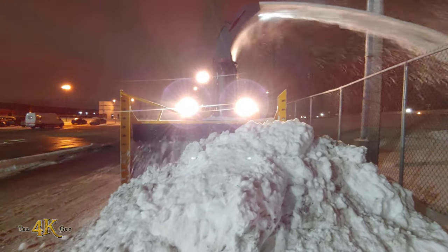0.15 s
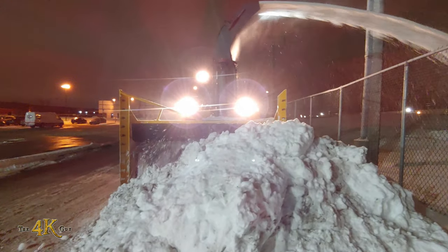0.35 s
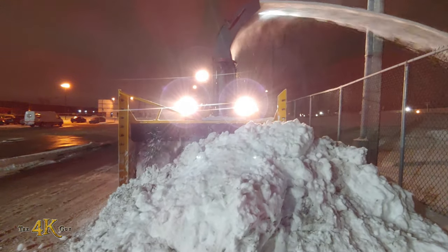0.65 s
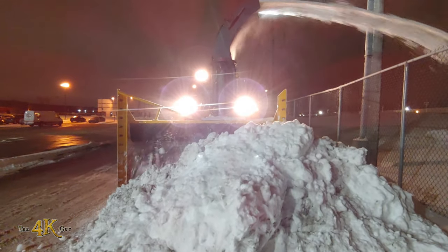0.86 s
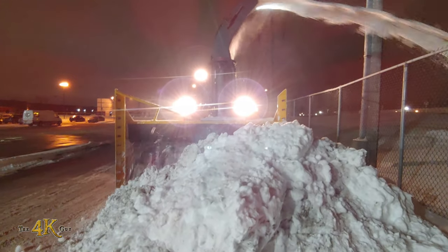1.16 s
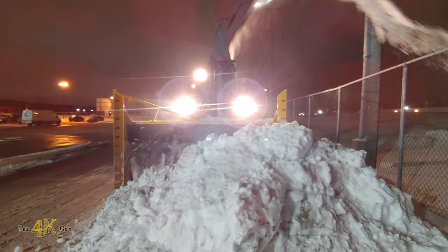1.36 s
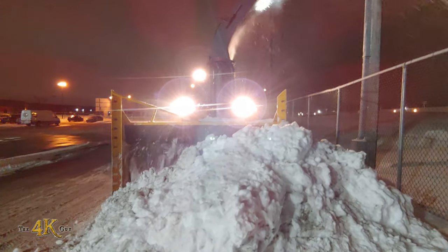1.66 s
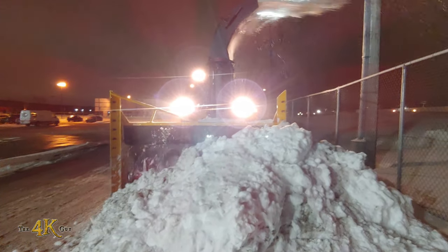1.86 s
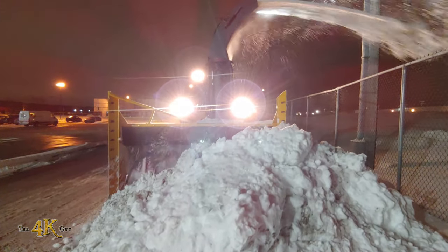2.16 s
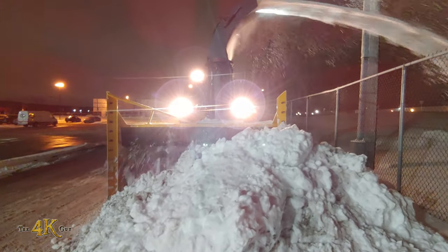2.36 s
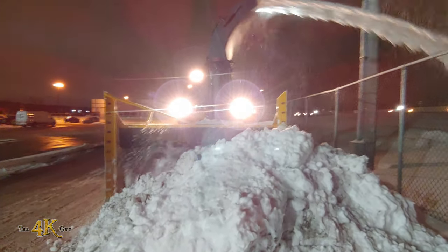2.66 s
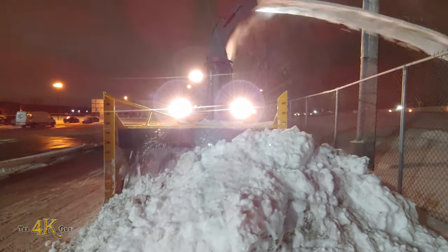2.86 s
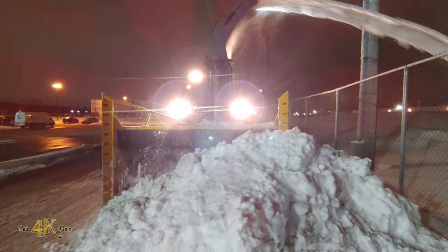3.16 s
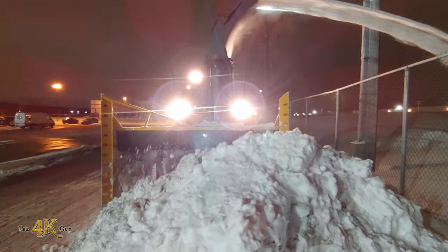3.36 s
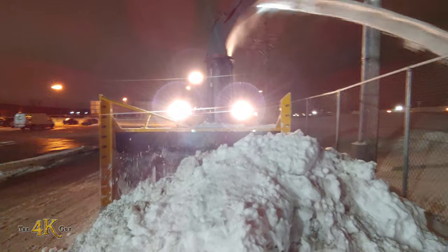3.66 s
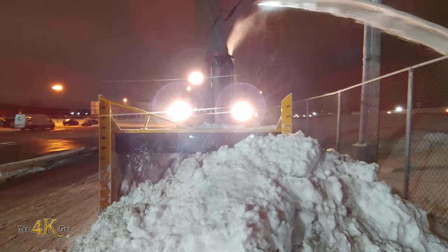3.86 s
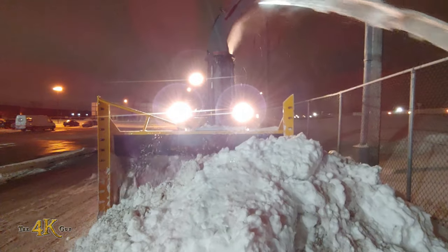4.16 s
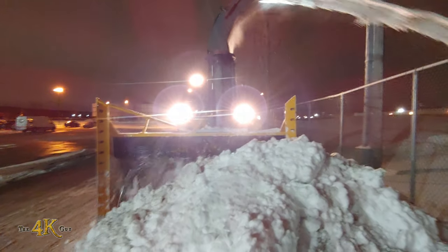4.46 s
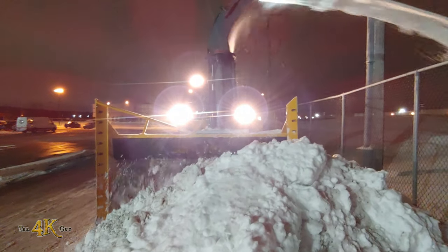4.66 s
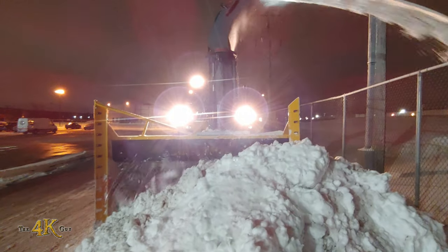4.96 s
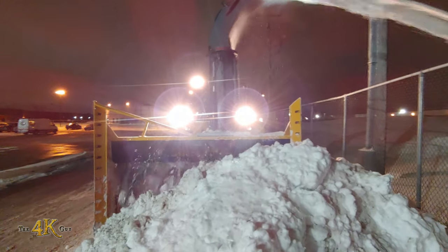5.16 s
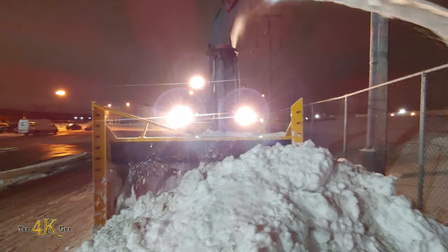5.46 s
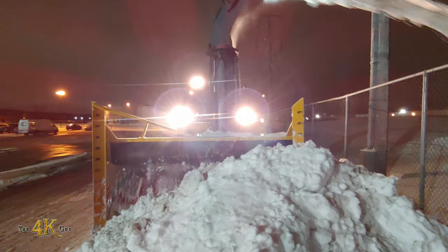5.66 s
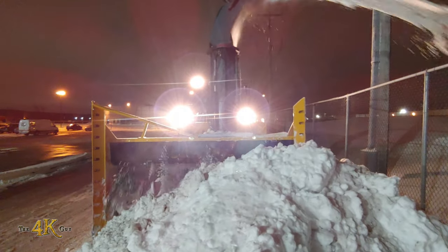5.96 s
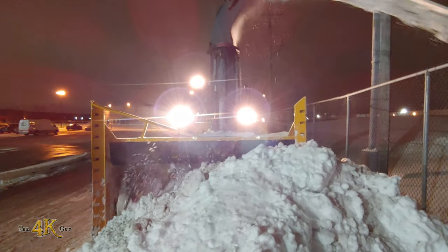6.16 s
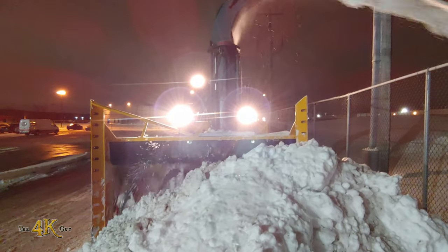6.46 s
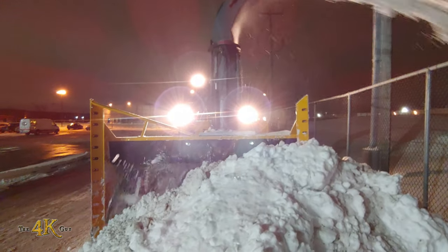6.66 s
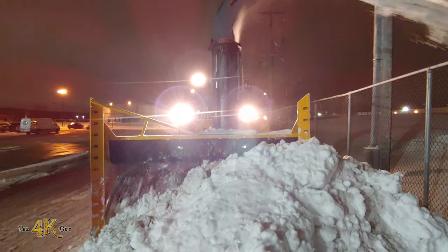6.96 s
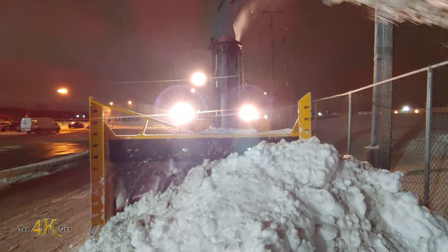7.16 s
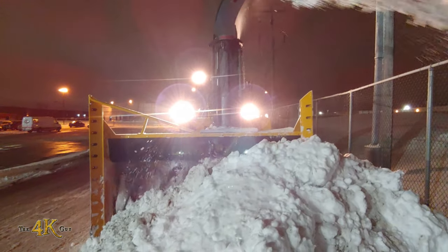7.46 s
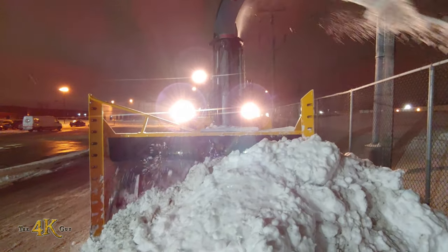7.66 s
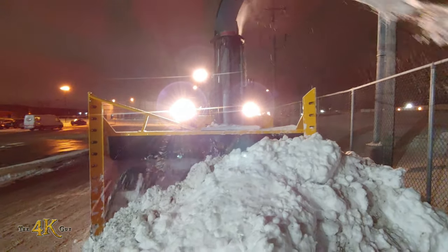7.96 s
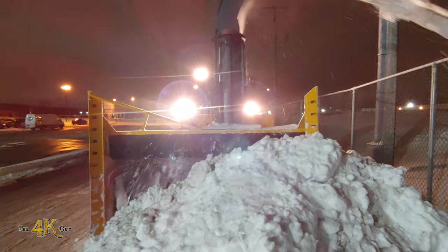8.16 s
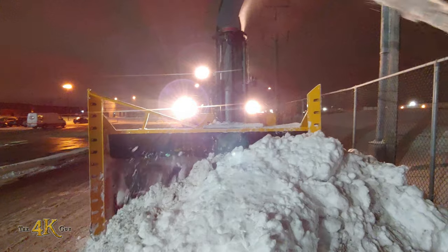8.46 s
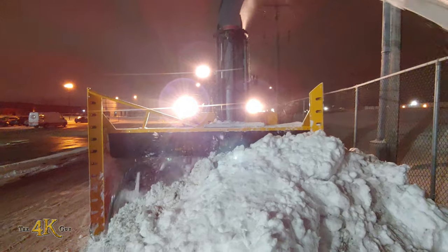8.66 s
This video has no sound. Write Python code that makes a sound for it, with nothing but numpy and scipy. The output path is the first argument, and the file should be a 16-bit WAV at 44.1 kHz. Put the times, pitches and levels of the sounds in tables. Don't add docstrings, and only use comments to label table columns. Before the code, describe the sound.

Heavy engine drone around 100 hertz under a dense bright hiss of thrown snow, with wavering mid-pitched whines and a faint very high whistle, all continuous.

```python
import sys
import numpy as np
from scipy import signal
from scipy.fft import rfft, irfft, next_fast_len
from scipy.io import wavfile
from scipy.ndimage import uniform_filter1d, map_coordinates

SR = 44100
rng = np.random.default_rng(int(sys.argv[2]) if len(sys.argv) > 2 else 0)


def volts_from_db(level):
    exponent = np.asarray(level, float) / 20
    return 10 ** exponent


def unload_wav(signal):
    wavfile.write(
        sys.argv[1],
        SR,
        np.round(np.clip(np.atleast_2d(signal).T, -1, 1) * 32767).astype(np.int16),
    )


N = 388521

# time in seconds, crank speed in Hz, firing tone in dB, left over right in dB.
CRANK_RUN = [(0, 34.4, -12, 2), (.55, 34.57, -10, 2.6), (1.0, 34.28, -8.8, 3.4), (1.5, 33.75, -8, 1.6),
             (2.0, 33.58, -8.5, 1.5), (2.45, 33.45, -8, 1.5), (2.55, 33.37, -12.5, 2.8),
             (2.9, 33.27, -11.5, 2.5), (3.36, 32.73, -14, 0), (3.5, 33.28, -13, 1.5), (3.9, 33.5, -10, 3.3),
             (4.4, 33.9, -10.5, 3.4), (5.1, 33.14, -10.5, 4), (6.2, 33.39, -9.5, 3.5),
             (6.75, 33.86, -9.5, 3), (7.4, 33.78, -9.5, 3), (8.2, 32.96, -9, 4.5), (8.81, 33.1, -9.5, 3.5)]
# time in seconds, flow in dB over an even feed.
SNOW_FLOW = [(0, 2.5), (.35, 1.5), (.85, 0), (2.35, -.5), (2.65, 2.5), (3.5, 3.5), (4.0, 1.5), (5.1, 0.5),
             (7.0, 0.5), (7.5, .5), (8.22, -2.5), (8.81, 0.5)]


def along(points, hz):
    f, v = np.transpose(points)
    return np.interp(np.log(hz + 1), np.log(f + 1), v)


def unit(x):
    return x / np.sqrt(np.mean(x ** 2) + 1e-20)


def curves(rows):
    s, *columns = np.transpose(rows)
    t = np.arange(N) / SR
    return [np.interp(t, s, column) for column in columns]


def wobble(rate):
    knots = rng.standard_normal(int(N * rate / SR) + 4)
    return map_coordinates(knots, [np.arange(N) * rate / SR], order=1)


def angle(hz):
    return 2 * np.pi * np.cumsum(hz) / SR


def tone(phase, db, blur, flutter_db):
    level = volts_from_db(db + flutter_db * wobble(18))
    return np.sqrt(2) * level * np.sin(phase + blur * wobble(25))


def swells(rest_db, rows):
    t = np.arange(N) / SR
    bells = sum(volts_from_db(db) * np.exp(-.5 * ((t - s) / width) ** 2) for s, width, db in rows)
    return 20 * np.log10(volts_from_db(rest_db) + bells)


def filtered(x, response):
    m = next_fast_len(N + 8192)
    return irfft(rfft(x, m) * response(np.fft.rfftfreq(m, 1 / SR)), m)[..., :N]


def rush(spectrum, patchy_db):
    # frequency in Hz, coherence of the two ports from 0 to 1.
    coherence = [(60, 0.77), (500, 0.99), (1000, 0.3), (2000, 0), (2800, 0.12), (3800, 0.2), (4600, 0),
                 (6500, 0.66), (8500, 0.32), (12800, 0), (15000, 0.2)]
    z = signal.stft(rng.standard_normal((2, N)), nperseg=512)[2]
    patches = uniform_filter1d(rng.standard_normal(z.shape[1:]), size=6, axis=0)
    patches = uniform_filter1d(patches, size=12, axis=1)
    pair = signal.istft(z * volts_from_db(patchy_db * unit(patches)), nperseg=512)[1][:, :N]

    def response(hz):
        turn = np.arccos(np.clip(along(coherence, hz), 0, 1)) / 2
        return volts_from_db(along(spectrum, hz)) * [np.cos(turn), np.sin(turn)]

    same, other = filtered(pair, response)
    return unit(np.array([same + other, same - other]))


def diesel(crank):
    # centre in seconds, width in seconds, level in dB.
    stumbles = [
        [(.35, 0.59, -19), (2.1, 0.17, -22), (3.3, 0.58, -27)],
        [(3.1, .05, -26), (3.44, 0.047, -19)],
        [(3.3, 0.44, -33.5)],
    ]
    # multiple of crank speed, rms level in dB.
    weak_orders = [(.5, -32), (1.5, -40), (2.5, -40), (3.5, -51), (4.5, -40.5), (5, -44.5), (7, -45.5),
                   (8, -48), (9, -45.5), (13, -45), (19, -46.5), (30.83, -46.5), (34.5, -49), (39, -42.5),
                   (43.17, -37.5), (96, -67), (120, -46)]
    auger_hz = 2.97
    t = np.arange(N) / SR
    _, firing_db, pan_db = curves(CRANK_RUN)
    once_db = swells(-32.5 + 0.5 * t, stumbles[0])
    twice_db = swells(-33.5, stumbles[1])
    fourth_db = swells(-37, stumbles[2])

    port_gains = volts_from_db(np.array([pan_db - 3.5, 5 - pan_db]) / 2)
    boom = port_gains * tone(3 * crank, firing_db, blur=0.048, flutter_db=0.6)
    boom = boom + tone(6 * crank + 1.95, -25.5 + 1.09 * t, blur=.12, flutter_db=.8)
    boom = boom + tone(crank, once_db, blur=.08, flutter_db=.3)
    boom = boom + tone(crank + 2 * np.pi * auger_hz * t, once_db - 11, blur=.08, flutter_db=2.0)
    boom = boom + tone(2 * crank, twice_db, blur=.3, flutter_db=3.0)
    boom = boom + tone(4 * crank, fourth_db, blur=0.25, flutter_db=6.0)

    growl_db = 0.45 * curves(SNOW_FLOW)[0]
    for multiple, db in weak_orders:
        phase = multiple * crank + 2 * np.pi * rng.random()
        boom = boom + tone(phase, db + growl_db + 2.5 * wobble(2), blur=.45, flutter_db=2.5)
    return boom


def snow(crank):
    # frequency in Hz, density in dB per Hz.
    rumble_spectrum = [(20, -30), (40, -6), (65, -0.5), (120, -3.5), (170, -4.5), (260, -10.5), (400, -9.5),
                       (600, -13.5), (900, -16), (1300, -37.5)]
    roar_spectrum = [(500, -4), (800, 1.5), (1100, -2.5), (1750, -8), (2300, -4), (2800, -5.5),
                     (3500, -1.5), (4300, -10), (6000, -47)]
    hiss_spectrum = [(3000, -17), (4500, -3.5), (5500, -3), (6500, 4), (7500, 3), (8500, -9), (10000, -13),
                     (11500, -18.5), (13000, -47)]
    spray_spectrum = [(9000, -23), (11000, -5), (12500, 2), (14000, -5), (16000, 1)]
    even_db = [-26.5, -27.5, -23, -41]
    growth = [0.66, 0.53, 1.36, 0.63]
    flow_db, = curves(SNOW_FLOW)
    rumble_db, roar_db, hiss_db, spray_db = [db + grows * flow_db for db, grows in zip(even_db, growth)]
    load = wobble(14)
    beat = np.cos(3 * crank + 0.92)
    roar_db = roar_db + .5 * load + 0.47 * beat
    hiss_db = hiss_db + 0.57 * load + 1.1 * beat + 0.78 * np.cos(crank)
    spray_db = spray_db + .7 * load + .8 * wobble(40)
    rumble = volts_from_db(rumble_db) * rush(rumble_spectrum, patchy_db=2.45)
    roar = volts_from_db(roar_db) * rush(roar_spectrum, patchy_db=1.5)
    hiss = volts_from_db(hiss_db) * rush(hiss_spectrum, patchy_db=1.16)
    spray = volts_from_db(spray_db) * rush(spray_spectrum, patchy_db=3.5)
    return rumble + roar + hiss + spray


def shaft_tones(crank, orders, rest_db, loads):
    total = 0
    for k, db, rows in zip(orders, rest_db, loads):
        total = total + tone(k * crank + k, swells(db, rows), blur=.3 + .004 * k, flutter_db=2.1 + .008 * k)
    return total


def pump(crank):
    orders = [12, 24, 36, 48, 60, 108]
    rest_db = [-42, -52, -41.5, -58, -53, -52]
    # centre in seconds, width in seconds, level in dB.
    peaks = [
        [(2.1, .35, -35.5), (3.0, 0.097, -35), (4.55, 0.11, -34)],
        [(.7, 1, -34.5), (1.8, 0.16, -29.5), (2.3, .25, -25), (2.8, .12, -30.5), (3.28, 0.075, -24),
         (3.65, 0.079, -30), (4.3, 0.26, -21.5), (5.15, 0.081, -34.5), (6.85, 0.32, -32.5), (7.5, 0.33, -38),
         (8.6, 0.31, -28)],
        [(1.0, 0.28, -39), (3.25, 0.1, -41), (4.3, .1, -39), (5.3, 0.21, -38.5), (6.1, 0.15, -39)],
        [(1.5, .12, -45), (7.1, 0.36, -39), (8.6, .25, -43)],
        [(.6, 0.44, -41), (1.25, 0.1, -47), (4.7, 0.89, -53), (6.65, 0.28, -45), (7.33, 0.13, -43)],
        [(2.5, 0.15, -59), (3.05, 0.39, -36.5), (5.0, .17, -40)],
    ]
    return shaft_tones(crank, orders, rest_db, peaks)


def gears(crank):
    orders = [37 / 3, 74 / 3, 16, 70.6]
    rest_db = [-51, -47, -52.5, -53]
    # centre in seconds, width in seconds, level in dB.
    loads = [
        [(.6, .4, -34), (2.1, .45, -42), (3.1, .2, -30), (4.6, .15, -48)],
        [(1.65, 0.084, -46), (4.45, 0.18, -36.5), (6.75, .25, -43)],
        [(2.3, .6, -40.5), (3.03, 0.09, -31), (3.5, 0.15, -34), (5.8, 0.48, -50)],
        [(2.55, 0.11, -43), (4.6, 0.32, -43.5), (5.55, 0.077, -47)],
    ]
    return shaft_tones(crank, orders, rest_db, loads)


def loader_drive():
    # time in seconds, frequency in Hz, level in dB.
    hunting = [(0, 347, -55), (.85, 348, -35.5), (1.2, 372.6, -34), (1.9, 359.3, -31.5),
               (2.5, 367.6, -37.5), (3.2, 364, -40), (3.9, 378.3, -41), (4.1, 371, -33), (4.35, 354.2, -41),
               (4.8, 352.4, -34.5), (5.2, 384.3, -40), (5.65, 384.4, -34.5), (6.05, 346, -35),
               (6.45, 370, -33), (6.9, 354.5, -33.5), (7.5, 378, -34), (7.85, 361.2, -36), (8.3, 378, -44)]
    hz, db = curves(hunting)
    return tone(angle(hz), db, blur=0.25, flutter_db=3.5)


def turbocharger(crank):
    # time in seconds, blade-passing frequency in Hz.
    blades = [(0, 11456), (.45, 11180), (1.05, 10644), (1.35, 10555), (2.0, 10630), (2.9, 10685),
              (3.7, 11000), (4.05, 10730), (4.55, 10340), (4.85, 10262), (5.35, 10370), (6.0, 10235),
              (6.3, 10220), (6.72, 10045), (6.95, 9800), (7.55, 9440), (8.1, 9412), (8.81, 9715)]
    # centre in seconds, width in seconds, level in dB.
    boost = [(1.6, .12, -39), (3.2, .12, -44), (3.75, .12, -50), (4.08, .05, -38), (4.37, .05, -36),
             (4.6, .08, -36), (4.9, 0.12, -28), (5.25, 0.095, -34), (5.58, 0.08, -29.5),
             (6.05, 0.24, -29.5), (6.62, .12, -36.5), (7.0, 0.13, -56), (7.55, .13, -35), (7.95, .22, -36),
             (8.4, 0.14, -46), (8.8, .06, -40)]
    blade_hz, = curves(blades)
    sway = (.35 + .15 * wobble(5)) * np.sin(3 * crank)
    phase = angle(blade_hz + 9 * wobble(19)) + sway
    return tone(phase, swells(-50.5, boost), blur=0.8, flutter_db=4.0)


def scene():
    crank = angle(curves(CRANK_RUN)[0])
    whines = pump(crank) + gears(crank) + loader_drive() + turbocharger(crank)
    return diesel(crank) + snow(crank) + whines


def band_limit(x):
    return signal.sosfilt(signal.butter(12, 15660, fs=SR, output="sos"), x)


def record(dry):
    # frequency in Hz, phase lead of the left port in radians.
    lead = [(0, 0), (600, 0.65), (860, 1.5), (1460, 3), (2070, 5.5), (3620, 12), (3960, 13.5), (4820, 16.5),
            (6460, 21.5), (7750, 21), (10200, 27.5), (12900, 26.5), (14600, 36), (15200, 34)]
    # frequency in Hz, left over right in dB.
    louder = [(35, 2.5), (80, 5.5), (200, 2), (1000, 0.5), (3500, 1.5), (5000, 3), (6000, -1), (7400, 11.5),
              (9000, 8), (12000, 4), (15000, 1)]
    offset = [
        [.0175],
        [.0012],
    ]
    side = np.array([[.5], [-.5]])

    def ports(hz):
        phase = side * np.interp(hz, *np.transpose(lead))
        return volts_from_db(side * along(louder, hz)) * np.exp(1j * phase)

    x = filtered(dry, ports) + offset
    x = x / (1 + np.abs(x / 1.025) ** 10) ** .1
    return band_limit(x)


dry = scene()
out = record(dry)
unload_wav(out)
```